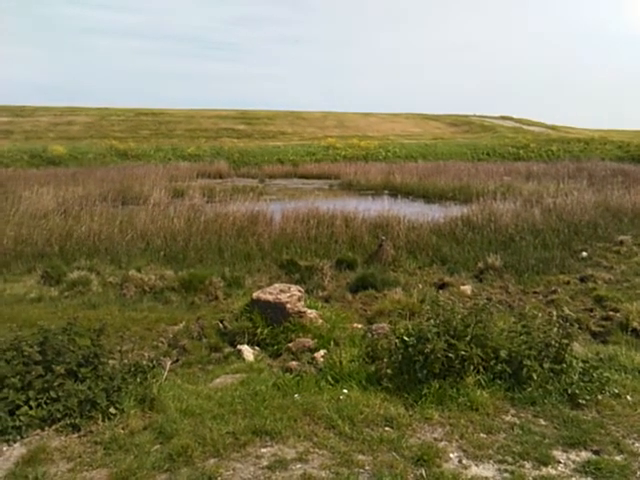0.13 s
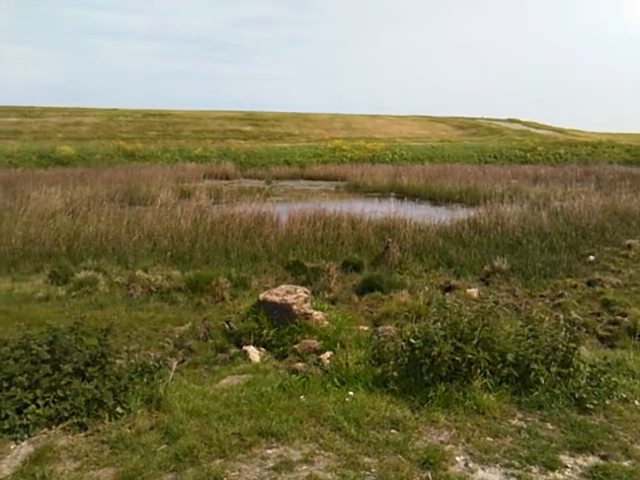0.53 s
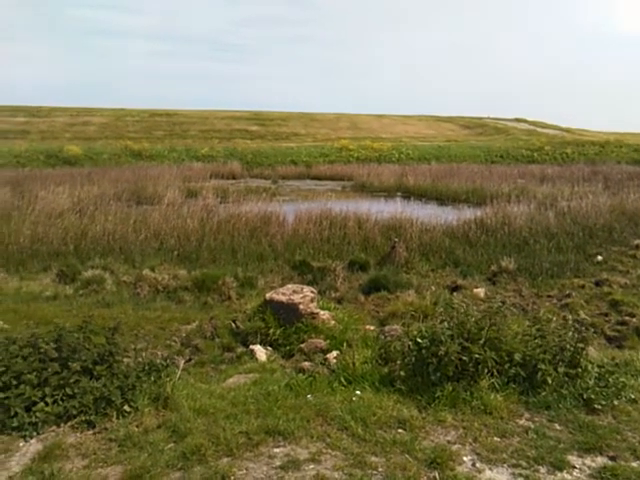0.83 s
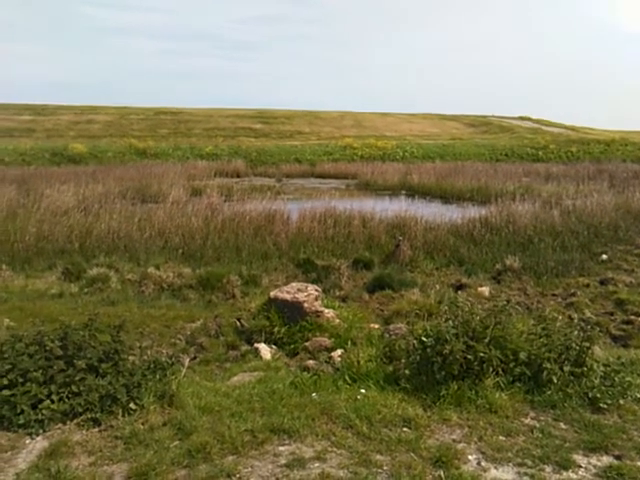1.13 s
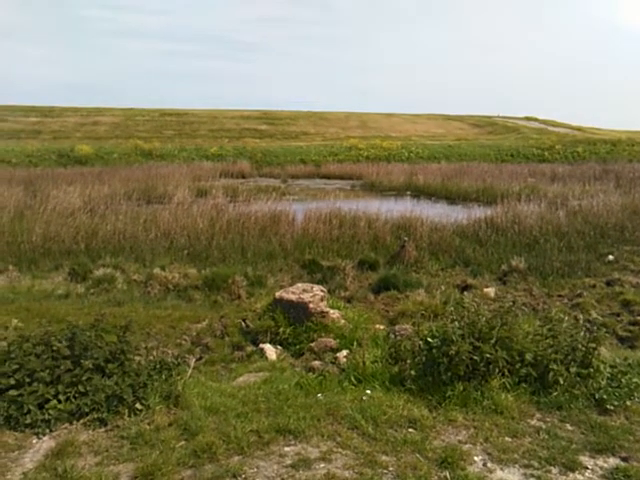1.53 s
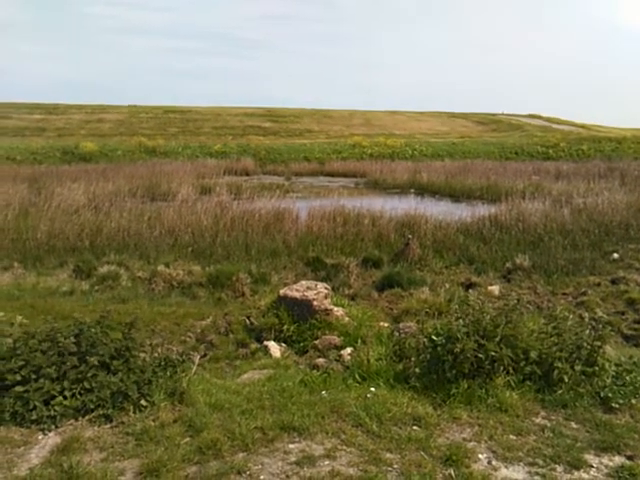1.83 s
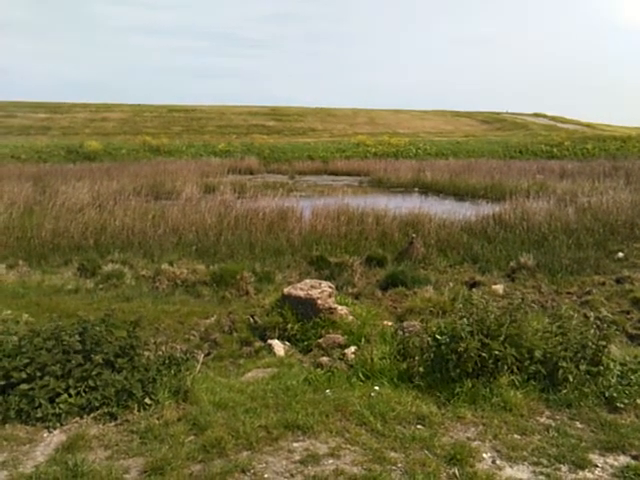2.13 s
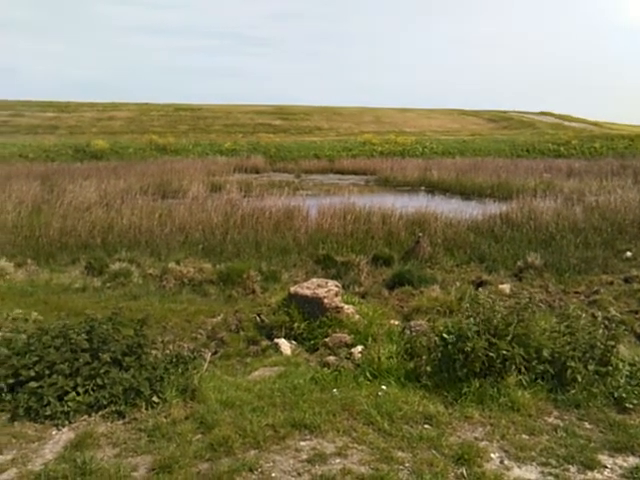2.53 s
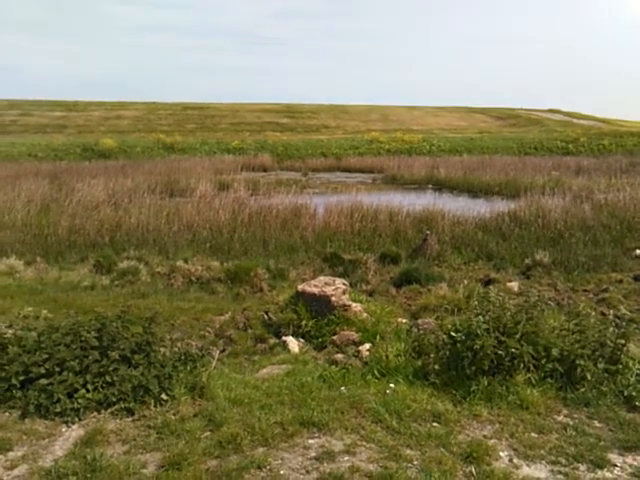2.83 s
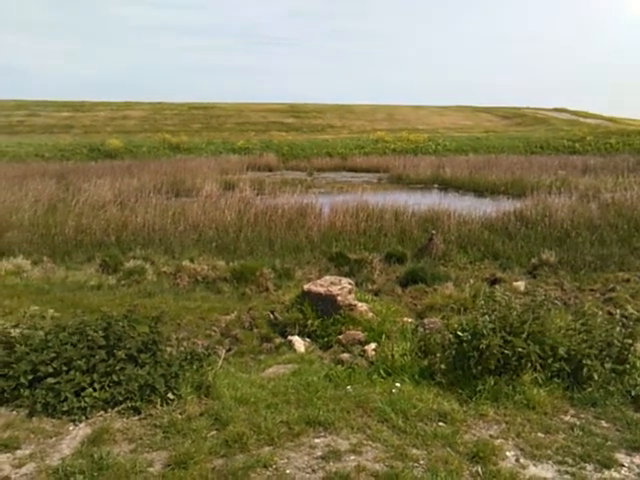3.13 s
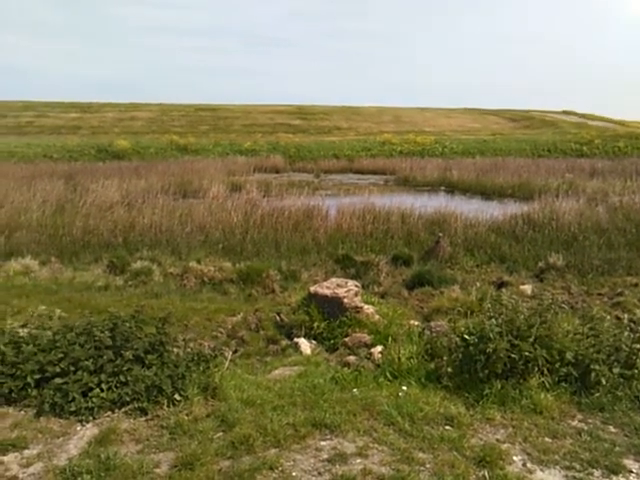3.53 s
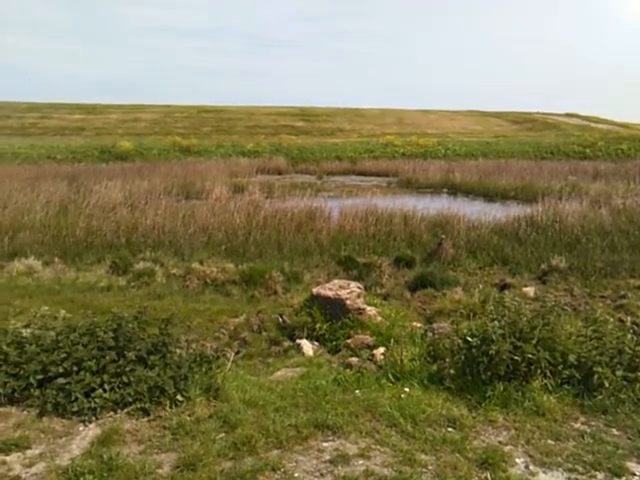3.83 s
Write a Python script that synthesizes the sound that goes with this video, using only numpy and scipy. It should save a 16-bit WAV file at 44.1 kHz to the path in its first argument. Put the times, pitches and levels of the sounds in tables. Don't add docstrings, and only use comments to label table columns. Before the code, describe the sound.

Marsh frogs some way off cackle, croak and whine in quick harsh pulses over a faint far chorus, while gusts rumble and slap a bare microphone in an open reedy marsh; faint birds whistle later.

```python
import sys
import numpy as np
from scipy import signal
from scipy.fft import rfft, irfft, next_fast_len
from scipy.io import wavfile
from scipy.ndimage import uniform_filter1d, minimum_filter1d, map_coordinates

SR = 44100
rng = np.random.default_rng(int(sys.argv[2]) if len(sys.argv) > 2 else 0)


def volts(x):
    e = np.asarray(x, float) / 20
    return 10 ** e


def master_out(mix):
    frames = np.transpose(np.atleast_2d(mix))
    ceiling = np.clip(frames, -1, 1)
    pcm = np.round(ceiling * 32767).astype(np.int16)
    wavfile.write(sys.argv[1], SR, pcm)


N = 176400
t = np.arange(N) / SR
JITTER = 0.035


def unit(x):
    return x / np.sqrt(np.mean(x ** 2) + 1e-20)


def wobble(rate):
    knots = rng.standard_normal(int(N * rate / SR) + 4)
    return map_coordinates(knots, [t * rate])


def coloured(x, points):
    hz, db = np.transpose(points)
    size = next_fast_len(N + 8192)
    log_hz = np.log(np.fft.rfftfreq(size, 1 / SR) + 1)
    return irfft(rfft(x, size) * volts(np.interp(log_hz, np.log(hz), db)), size)[:N]


def noise(points):
    return unit(coloured(rng.standard_normal(N), points))


def arch(u, rise, fall):
    nearest_end = np.minimum(u / rise, (1 - u) / fall)
    return np.sin(np.pi / 2 * np.clip(nearest_end, 0, 1)) ** 2


def gust_strength():
    # start in seconds, length in seconds, strength in dB.
    gusts = [(-.03, 0.65, -15), (0.638, 0.34, -13.5), (0.965, 0.25, -16.5), (1.256, 0.13, -13.5),
             (1.364, 0.11, -21), (1.563, 0.14, -17.5), (1.675, 0.13, -9), (1.794, 0.18, -19),
             (1.966, 0.16, -16), (2.275, 0.095, -32), (2.705, 0.077, -22), (2.529, 0.16, -18),
             (2.753, 0.32, -10), (3.03, 0.17, -21.5), (3.161, 0.18, -18), (3.351, 0.2, -16.5),
             (3.532, 0.23, -20.5), (3.688, 0.069, -9), (3.722, 0.12, -27), (3.798, .25, -15.5)]
    edge_s, fall_s, lull_db = 0.01, 0.075, -39.5
    gust = np.zeros(N)
    for s, long_s, db in gusts:
        u = np.clip((t - s) / long_s, 0, 1)
        gust += volts(db) * arch(u, edge_s / long_s, fall_s / long_s)
    return np.hypot(gust, volts(lull_db)) * volts(4.43 * np.tanh(wobble(14)))


def eddies():
    # time in seconds, peak level in dB, pitch in Hz.
    slaps = [(0.0, -13.5, 290), (0.02, -4, 390), (0.028, -14, 490), (0.038, -4, 605), (0.046, -11.5, 480),
             (0.071, -18, 384), (0.106, -20.5, 358), (0.204, -16, 330), (0.283, -12, 354),
             (0.307, -12.5, 352), (0.371, -13.5, 426), (0.381, -6.5, 340), (0.402, -15, 407),
             (0.493, -20.5, 360), (0.501, -12.5, 312), (0.553, -18.5, 374), (0.721, -15, 324),
             (0.745, -20.5, 370), (0.778, -18, 290), (0.838, -4, 398), (0.857, -6, 280),
             (0.978, -20.5, 388), (0.996, -11.5, 326), (1.008, -20, 383), (1.079, -18.5, 360),
             (1.316, -12, 380), (1.58, -19.5, 298), (1.7, -12, 294), (1.73, -13.5, 415), (1.747, -26, 400),
             (1.82, -21.5, 440), (1.846, -20.5, 408), (1.982, -16.5, 273), (2.79, -17.5, 320),
             (2.8, -8, 406), (2.811, -16.0, 394), (2.827, -8.5, 410), (2.875, -19, 397), (2.894, -3.5, 352),
             (2.901, -30.5, 455), (2.91, -15, 330), (2.921, -20, 424), (2.934, -13.5, 430),
             (2.943, -15.5, 540), (2.963, -13, 385), (2.989, -13.5, 314), (3.013, -20, 320),
             (3.03, -14.5, 302), (3.366, -12, 336), (3.38, -8.5, 390), (3.451, -11.5, 400),
             (3.472, -15, 270), (3.564, -15.5, 366), (3.581, -22, 394), (3.627, -10, 310),
             (3.806, -10.5, 338), (3.817, -9.5, 383), (3.953, -28, 275), (3.979, -16, 378),
             (3.994, -23, 494)]
    pop_db, pop_cycles, pop_lift, lead_s = 2, 0.34, 1.307, 0.0052
    slap_db, rise_s, slap_s = -5, 0.0011, 0.014
    pops, slap_power = np.zeros(N), np.zeros(N)
    for s, db, hz in slaps:
        turns = (t - s) * hz
        swing = np.cos(2 * np.pi * pop_lift * turns + 0.45)
        swing += 0.079 * np.cos(5 * np.pi * pop_lift * turns)
        pops -= volts(db + pop_db) * np.exp(-(turns / pop_cycles) ** 2 / 2) * swing
        age = np.clip(t - s + lead_s, 0, None)
        burst = (1 - np.exp(-age / rise_s)) * np.exp(-(age / slap_s) ** 1.7)
        slap_power += (volts(db + slap_db) * burst) ** 2
    return pops, slap_power


def wind():
    # frequency in Hz, density in dB per Hz.
    low = [(18, -63), (33, -20.5), (50, -3), (85, -4), (160, -9.5), (300, -26), (900, -120)]
    # frequency in Hz, density in dB per Hz.
    high = [(60, -44.5), (130, -5.5), (230, -4.5), (420, -13.5), (800, -53.5), (3000, -120)]
    # frequency in Hz, density in dB per Hz.
    crack = [(200, -15.5), (450, -5), (900, -15.5), (1600, -39), (5000, -120)]
    flap_db, flap_grows = -10.5, 1.287
    crack_db, crack_grows = -4.5, 1.44
    strength = gust_strength()
    pops, slap_power = eddies()
    flap = volts(flap_db + 4.5 * np.tanh(wobble(35))) * strength ** flap_grows
    roll = noise(low)
    flap_on_roll = flap * np.sqrt(0.46 + roll ** 2)
    bright = np.hypot(flap_on_roll, np.sqrt(slap_power)) * volts(4.32 * wobble(120))
    crackle = volts(crack_db) * bright ** crack_grows * noise(crack)
    return pops + strength * roll + bright * noise(high) + crackle


def hiss():
    # frequency in Hz, density in dB per Hz.
    spectrum = [(2000, 10), (6000, -10.5), (7500, -4.5), (14000, -7.5), (16000, -10.5)]
    return volts(-57.5 + 0.36 * wobble(7.1)) * noise(spectrum)


def ticks():
    # time in seconds, level in dB.
    knocks = [
        (.019, 5.5),
        (0.836, -2.5),
    ]
    x = np.zeros(N)
    for s, db in knocks:
        age = t - s
        x += volts(db) * (age > 0) * np.exp(-np.abs(age) / 0.00011) * np.cos(2 * np.pi * 500 * age)
    return coloured(x, [(800, 10.5), (2500, -3.5), (16000, -18.5)])


def note(out, s, long_s, db, throat_hz, sac_hz, rate, end_rate, sac_db, sag, jitter, damp=1):
    pulses, ring_samples = 100, 600
    ring_s, sac_ring_s = 0.0105, 0.011
    scatter_db, wander, detune = 2.4, 0.014, 0.4
    draw = rng.standard_normal((pulses, 5))

    pulse_rate = np.interp(np.arange(pulses) / (long_s * rate), [0, 1], [rate, end_rate])
    gaps = (1 + jitter * draw[:, 0]) / pulse_rate
    u = (np.cumsum(gaps) - gaps[0])[:, None] / long_s
    at = (s + u * long_s) * SR
    first = np.ceil(at).astype(int)
    age = np.arange(ring_samples)[None] / SR + (first - at) / SR

    drift = wander * np.sin(draw[0, 0] + 70 * u * long_s)
    tune = 2 * np.pi * (1 + sag * (0.5 - u) + detune * jitter * draw[:, 1:2] + drift) * age
    bend = 1 + 0.07 * np.sin(4 * draw[0, 1] + 32 * u * long_s)
    modes = [(2, throat_hz * bend, 0.0024, ring_s), (3, 2250 / bend, -16.5, ring_s),
             (4, sac_hz, sac_db, sac_ring_s), (3, 3200, -25, ring_s)]
    ring = 0
    for k, hz, level, t60 in modes:
        fading_db = level + scatter_db * draw[:, k:k + 1] - 60 * age * damp / t60
        ring = ring + volts(fading_db) * np.sin(hz * tune)
    ring = ring * (1 - np.exp(-age / 0.0016)) * arch(u, 0.28, 0.35) * volts(db + 14.5)
    places = first + np.arange(ring_samples)
    return out + np.bincount(places.ravel(), ring.ravel(), N + SR)[:N]


def far_chorus(x):
    count = 70
    for i in range(count):
        start, length, level, size = rng.random(4)
        s = 3.5 * (i + start) / count
        x = note(x, s, 0.086 + 0.056 * length, -54 - 8 * level, 1150 + 600 * size, 2800 + 1800 * level,
                 200 + 90 * length, 230, -20.5, 0.086, JITTER)
    return x


def cackles(x):
    # time in seconds, level in dB, throat in Hz, vocal sac in Hz.
    calls = [(0.074, -39, 1636, 4510), (0.171, -38.5, 1574, 4450), (0.268, -36, 1633, 4250),
             (0.357, -37.5, 1590, 4300), (0.483, -42, 1960, 4800), (0.58, -38, 2040, 4540),
             (0.666, -37, 2120, 4830), (0.758, -36.5, 2095, 4600), (0.842, -32, 1950, 4580),
             (0.935, -38.5, 2110, 4670), (1.382, -39.5, 1800, 4140), (1.479, -35.5, 1635, 4380),
             (1.564, -32.5, 1744, 4210), (1.66, -31.5, 1730, 4220), (1.752, -34, 1837, 4270),
             (2.107, -28, 1507, 4020), (2.317, -29, 1540, 4000), (2.368, -28.5, 1650, 3650),
             (2.422, -33.5, 1560, 3680), (2.558, -35, 1835, 4450), (2.64, -35, 1995, 4530),
             (2.731, -32, 2020, 4400), (2.841, -31.5, 1570, 4340), (2.949, -31.5, 1790, 4330),
             (3.028, -25.5, 1747, 4190), (3.128, -31.5, 1805, 4190), (3.183, -40, 1640, 3640),
             (3.223, -38, 1670, 4130), (3.635, -33.5, 1405, 4140), (0.23, -45.5, 1200, 4200),
             (1.494, -43, 1420, 3720), (2.755, -34, 1420, 3200), (2.77, -34.5, 1573, 4490),
             (2.873, -34.5, 1760, 3530), (2.949, -35, 1420, 3530), (2.989, -31.5, 1414, 4390),
             (2.067, -42, 1410, 4600), (1.945, -38.5, 2250, 4420), (2.463, -35.5, 2033, 4600)]
    rate = 275
    for s, db, throat, sac in calls:
        x = note(x, s - 0.005, 0.055, db, throat, sac, rate, 0.76 * rate, -14, 0.055, JITTER)
    return x


def croaks(x):
    # start in seconds, length in seconds, level in dB, throat in Hz, vocal sac in Hz.
    calls = [(0.37, 0.085, -44, 1650, 3770), (0.448, 0.14, -52, 1570, 3660), (0.622, 0.2, -36, 1460, 4180),
             (0.858, .13, -30, 1473, 3980), (0.951, 0.094, -31, 1396, 3200), (1.023, 0.13, -34, 1490, 3480),
             (1.109, .07, -40.5, 1510, 2950), (1.269, 0.23, -26.5, 1530, 3840),
             (1.461, 0.12, -30.5, 1466, 3500), (1.605, 0.1, -41.5, 1413, 3250),
             (1.705, 0.069, -35.5, 1670, 3870), (1.787, 0.12, -25, 1580, 3800),
             (1.89, 0.057, -23.5, 1620, 3670), (1.96, .075, -29.5, 1800, 3120),
             (1.964, 0.18, -31, 1364, 3560), (2.186, 0.19, -36.5, 1526, 4070),
             (2.456, 0.16, -32, 1374, 3750), (2.532, .12, -34.5, 1594, 4460),
             (2.697, 0.17, -35.5, 1495, 3300), (2.846, 0.21, -34.5, 1278, 3820),
             (3.07, 0.082, -30, 1450, 3740), (3.504, 0.12, -42, 1467, 4670), (3.58, 0.086, -37, 1410, 4750),
             (3.294, 0.058, -45, 1660, 4150)]
    rate = 235
    for s, long_s, db, throat, sac in calls:
        x = note(x, s, long_s, db, throat, sac, rate, 0.82 * rate, -19, 0.06, JITTER)
    return x


def whines(x):
    # start in seconds, length in seconds, level in dB, pitch in Hz, throat in Hz.
    calls = [(0.543, 0.021, -32.5, 476, 1440), (0.592, 0.048, -36.5, 457, 940),
             (1.174, 0.06, -38.5, 440, 1716), (1.215, .1, -33.5, 415, 1890), (1.224, 0.027, -37, 437, 925),
             (1.609, 0.052, -28.5, 496, 1570), (1.765, 0.067, -27.5, 461, 1775),
             (2.747, 0.02, -41, 541, 2040), (3.224, 0.025, -31, 422, 1730), (3.52, 0.13, -43, 451, 2070),
             (3.673, .035, -23, 448.5, 1455)]
    for s, long_s, db, pitch_hz, throat in calls:
        x = note(x, s, long_s, db, throat, 3900, pitch_hz, 0.95 * pitch_hz, -26, 0.04, 0.008, damp=1.8)
    return x


def frogs():
    x = whines(croaks(cackles(far_chorus(np.zeros(N)))))
    breath = volts(-11.5) * noise([(20, 7.5), (500, 6), (1500, -43.5)])
    x = x * volts(wobble(23.977)) * (1 + breath)
    echo_db, echo_s = -14, 0.12
    tail = rng.standard_normal(SR // 4) * volts(-60 * t[:SR // 4] / echo_s)
    return x + volts(echo_db) * signal.fftconvolve(x, tail / np.linalg.norm(tail))[:N]


def birds():
    # start in seconds, length in seconds, level in dB, start pitch in Hz, end pitch in Hz.
    whistles = [
        (2.132, .197, -69, 5400, 5220),
        (2.73, .045, -67, 5450, 5450),
        (3.072, .024, -60, 5600, 5200),
        (3.36, .2, -76, 3600, 3450),
        (3.916, .008, -62, 4900, 5900),
        (3.932, .066, -52, 5300, 4950),
    ]
    x = np.zeros(N)
    for s, long_s, db, start_hz, end_hz in whistles:
        u = np.clip((t - s) / long_s, 0, 1)
        hook = 0.09 * (np.exp(-u / 0.05) - np.exp((u - 1) / 0.05))
        hz = (start_hz + (end_hz - start_hz) * u) * (1 + hook + 0.009 * wobble(25))
        level = volts(db + 3 + 3.5 * wobble(70)) * arch(u, 0.1, 0.1)
        x += level * np.sin(2 * np.pi * np.cumsum(hz) / SR)
    return x


def insect():
    # frequency in Hz, density in dB per Hz.
    spectrum = [(5000, -83), (7000, 18), (14500, 17.5), (17000, -1)]
    start_s, long_s, stroke_hz, level_db = 3.6, 0.35, 45, -61
    age = t - start_s
    strokes = (0.6 + 0.5 * np.sin(2 * np.pi * stroke_hz * age)) ** 2
    return volts(level_db) * arch(age / long_s, 0.1, 0.3) * strokes * noise(spectrum)


def scene():
    return (wind() + hiss() + ticks() + frogs() + birds() + insect())[None]


def limiter(x):
    ceiling, squeeze, step_hz = 0.43, 0.85, 6000
    hold = int(0.004 * SR)
    wanted = np.minimum(1, ceiling / (np.abs(x) + 1e-9)) ** squeeze
    gain = uniform_filter1d(minimum_filter1d(wanted, hold), hold)
    gain = uniform_filter1d(gain, 24)
    steps = np.sin(2 * np.pi * step_hz * t) + np.sin(4 * np.pi * step_hz * t) / 2
    buzz = np.gradient(gain, axis=1) * SR / step_hz / np.pi * steps
    return x * (gain + buzz)


def roll_off(x):
    return signal.sosfilt(signal.butter(12, 15200, fs=SR, output="sos"), x)


def record(dry):
    mix = limiter(dry)
    return roll_off(mix)


dry = scene()
out = record(dry)
master_out(out)
```